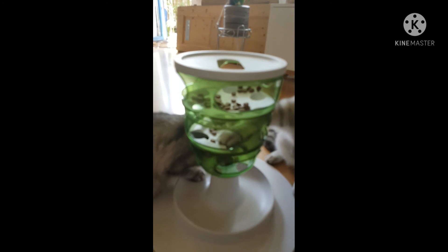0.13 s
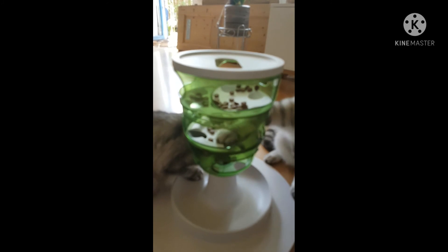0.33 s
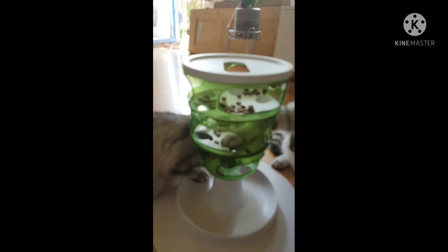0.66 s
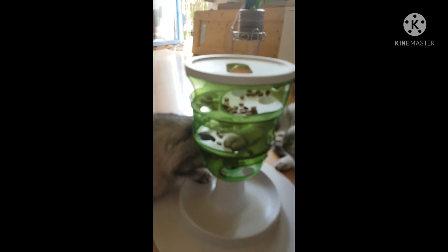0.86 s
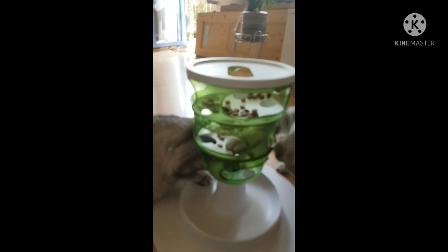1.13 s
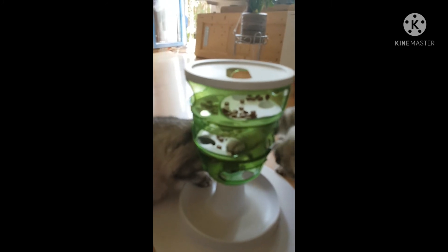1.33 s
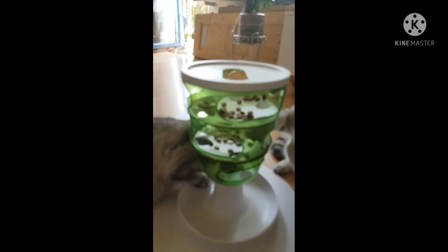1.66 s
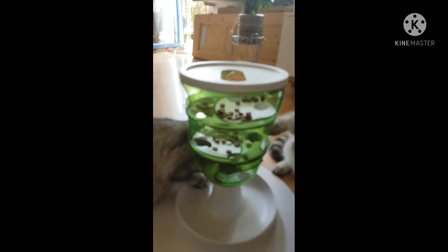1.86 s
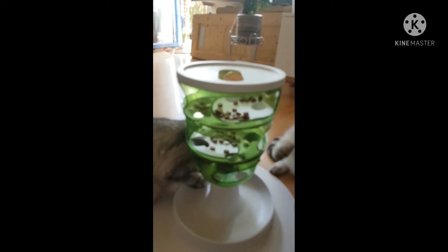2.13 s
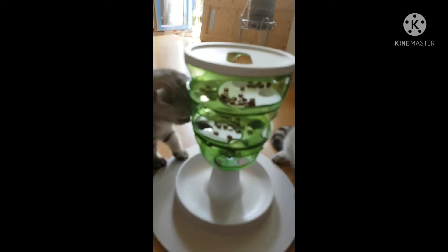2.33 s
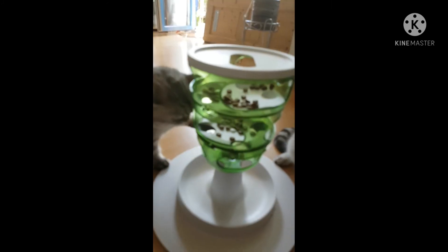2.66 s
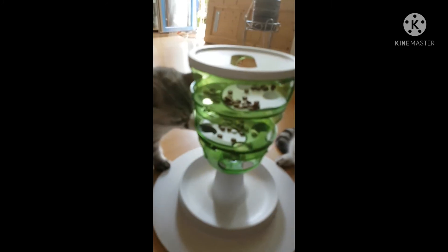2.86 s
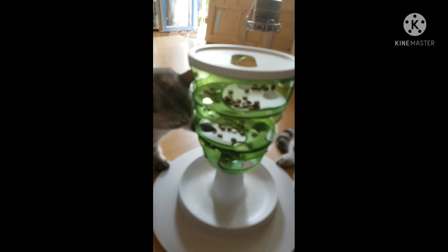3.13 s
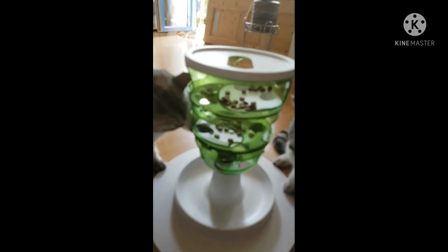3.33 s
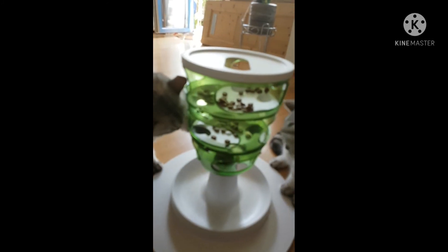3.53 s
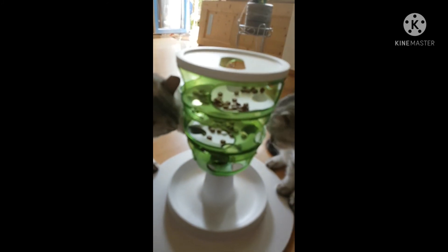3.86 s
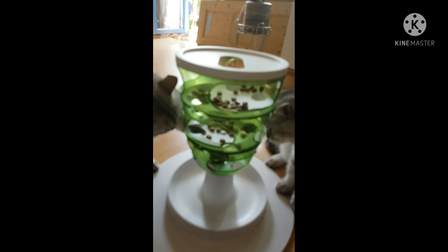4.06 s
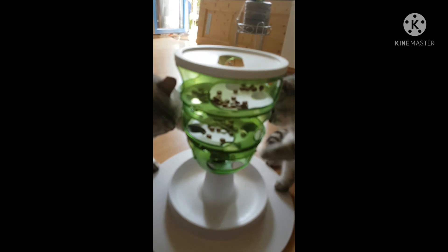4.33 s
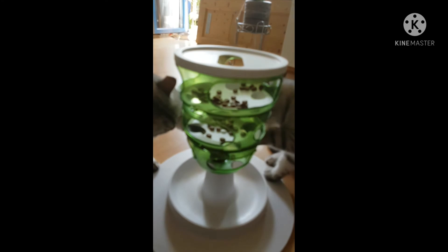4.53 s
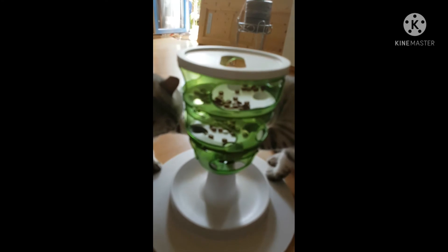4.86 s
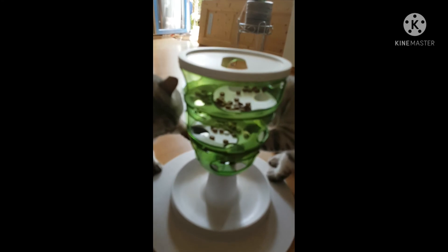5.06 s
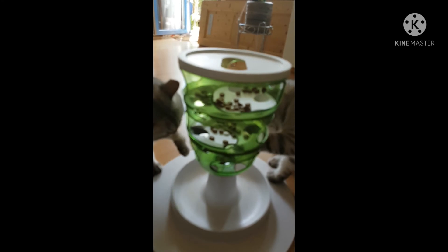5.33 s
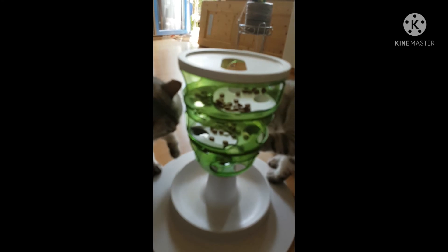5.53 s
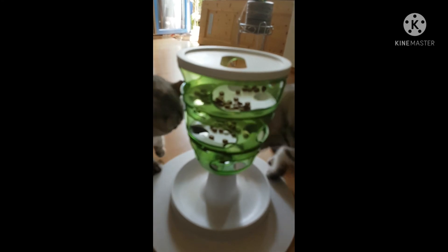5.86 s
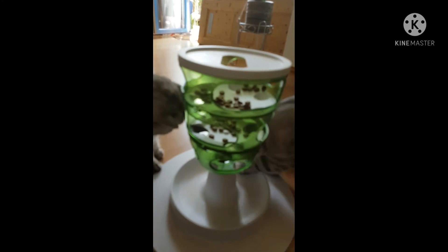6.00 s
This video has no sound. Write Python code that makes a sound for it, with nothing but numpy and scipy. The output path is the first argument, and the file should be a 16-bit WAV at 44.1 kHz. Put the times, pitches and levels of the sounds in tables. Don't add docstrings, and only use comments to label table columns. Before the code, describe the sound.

Dry kibble ticks, rattles and scrapes on the plastic tiers of a treat tower as cats paw it, over a faint motor hum.

```python
import sys
import numpy as np
from scipy import signal
from scipy.fft import rfft, irfft
from scipy.io import wavfile
from scipy.ndimage import uniform_filter1d

SR = 44100
rng = np.random.default_rng(int(sys.argv[2]) if len(sys.argv) > 2 else 0)


def store_wav(level_fs):
    pcm = np.round(np.clip(np.atleast_2d(level_fs), -1, 1) * 32767)
    wavfile.write(sys.argv[1], SR, pcm.T.astype(np.int16))


def magnitude_from_level(level_db):
    exponent = np.asarray(level_db, float) / 20
    return 10 ** exponent


N = 272538

# start in seconds, peak in dB, tray ring in Hz, pellet tick in dB re the peak.
WALL_HITS = [(0.1903, -27, 1940, -24), (0.2552, -34, 1540, -14), (1.142, -47, 1370, -11),
             (1.254, -36.5, 4560, -10), (1.416, -41.5, 1420, -4), (1.6843, -44, 2650, 1),
             (1.7547, -21, 3400, -40), (2.0599, -35, 4440, -24), (2.5033, -47.5, 2300, -26),
             (3.2172, -38.5, 1010, -25), (3.2864, -29, 3460, -25), (3.306, -45, 2340, -34),
             (3.3221, -25, 2520, -27), (3.5096, -30, 3070, -34), (3.5144, -29, 1050, -37),
             (3.5954, -19.5, 2150, -25), (3.6117, -22, 2260, -21), (3.8772, -19, 2800, -17.5),
             (3.9973, -34.5, 1410, -28.5), (4.2178, -39, 1030, -33), (4.2382, -33, 3000, -30),
             (4.5002, -33, 1010, -19), (4.7458, -30, 1220, -30), (4.7587, -36, 3000, -28),
             (4.7688, -36.5, 2400, -26), (5.1487, -40, 3100, -12.5), (5.233, -31.5, 3100, -20),
             (5.2846, -35.5, 2830, -14), (5.4851, -30, 2850, -21), (5.708, -26.5, 3120, -30)]
RIM_HITS = [(0.2226, -44, 2040, -2), (0.669, -38, 1820, -40), (0.9888, -35, 1610, -7.5),
            (1.5609, -38.5, 1320, -10), (1.731, -25.5, 2670, -17), (2.2348, -52, 1630, -5),
            (2.4178, -44.5, 1350, -27), (3.0634, -35, 968, -30), (3.2929, -33.5, 1540, -3.5),
            (3.2935, -24.5, 2400, -32), (3.3043, -25, 3100, -25), (3.3624, -20.5, 3030, -6),
            (3.5108, -45, 2670, -31), (4.3272, -12, 2960, -20), (4.7025, -37.5, 1296, -17),
            (4.7301, -34, 2800, -18), (5.4136, -38, 1040, -15), (5.4969, -17, 3530, -28),
            (5.5339, -24, 2770, -21), (5.5798, -26.5, 2500, -18), (5.812, -11, 7600, 0),
            (5.9472, -33, 2160, -12), (5.965, -26, 4000, -20), (6.008, -30.5, 7300, 11.5),
            (6.0175, -15.5, 1300, -33)]
TRAY_HITS = [(0.5735, -20.5, 1940, -1.5), (1.7826, -26.5, 1990, -25), (1.8796, -9.5, 4140, 5.5),
             (1.9452, -24.5, 3300, -13.5), (2.3629, -38.5, 1530, -34), (3.2911, -26, 2920, -30),
             (3.2997, -18.5, 1230, -40), (3.5967, -20.5, 2700, -49), (3.6022, -17.5, 1420, -36),
             (3.6035, -17.5, 1110, -24), (3.6081, -21, 1730, -48), (4.249, -30, 1220, -35),
             (4.2735, -39, 1170, -29), (5.0634, -47.5, 2400, 0), (5.2011, -36, 2900, -15),
             (5.228, -31, 3300, -25), (5.68, -30.5, 3080, -36), (5.7017, -22, 1280, -16.5),
             (5.7148, -22.5, 2130, -22), (5.7237, -33, 2050, -10), (5.8167, -11, 7700, -8.5),
             (5.8752, -8, 6400, -7.5), (5.898, -12.5, 4540, -7), (5.9187, -27, 4630, -21),
             (5.9828, -25.5, 3890, -6), (5.998, -27, 4960, -9), (6.0085, -16.5, 5660, -27),
             (6.0244, -18, 4800, -6)]
# start in seconds, peak in dB, ring in Hz.
PELLET_TICKS = [(0.16, -52, 7000), (0.4124, -52, 7750), (0.717, -44, 3950), (0.729, -45, 6400),
                (0.845, -44.5, 7000), (1.0044, -46, 4410), (1.0225, -43, 4300), (1.4004, -51, 4410),
                (1.4164, -39, 6560), (1.53, -44.5, 4660), (1.5404, -47, 4130), (1.6843, -46.5, 7500),
                (1.795, -33, 4370), (1.8084, -40.5, 4380), (1.817, -39.5, 4750), (2.2492, -46.5, 3650),
                (2.3794, -42.5, 4690), (4.9294, -48.5, 6600), (5.0635, -39.5, 3640)]
# start in seconds, echo level in dB, rattle length as a factor.
DEPTH = [(0, -5, 0.47), (.6, -1.5, 0.27), (.75, 2, .5), (1.7, -2, 0.22), (1.9, 1.5, 1.7), (3.2, 1.5, 2.2),
         (3.6, 2, 1.43), (3.88, -2, 1.34), (4.1, 13, 1.3), (4.33, 1, 0.85), (5.2, 7.5, 2.4),
         (5.55, 1, 1.15), (5.72, 1.5, 1.3), (5.8, 2, 0.67), (6.0, 4.5, 0.83), (6.18, 0, 1.2)]


def kibble():
    usual_db, longer_db_per_db = -31.5, 0.06
    ticks = [(s, db, hz, -12) for s, db, hz in PELLET_TICKS]
    # rows, body thump in dB re peak, rattle t60 in seconds
    kinds = [(WALL_HITS, -2.8, 0.031), (RIM_HITS, -7, 0.03), (TRAY_HITS, -46.5, 0.02), (ticks, -39, 0.0084)]
    out = np.zeros((2, N + 5000))
    longer = curve(DEPTH, column=2)
    for rows, body_db, t60 in kinds:
        for s, db, hz, tick_db in rows:
            start = round(s * SR)
            rattle_s = t60 * longer[start] * magnitude_from_level(longer_db_per_db * (db - usual_db))
            out[:, start:start + 3599] += contact(db, hz, body_db, tick_db, rattle_s)
    return thin(out[:, :N])


# mode in Hz, level in dB, t60 in seconds.
BODY_MODES = [(670, -11.5, 0.012), (1110, -23, 0.033), (1220, -4.5, 0.033), (1574, 24.5, 0.0026)]
# mode in Hz, level in dB, t60 in seconds.
TRAY_MODES = [(1940, -24.5, 0.0073), (2400, 7.5, 0.012), (2887, 12, 0.0066), (4034, 13, 0.0041),
              (4800, 13, 0.003), (5460, 21.5, 0.0015)]
# mode in Hz, level in dB, t60 in seconds.
PELLET_MODES = [(6820, 30.5, 0.00043), (7800, -3, 0.011), (8740, -5.5, 0.0039), (10870, -7, 0.0043),
                (11100, -10, 0.00066), (13500, -1, .0007), (13800, -3.5, 0.00033)]
TO_WALLS_DB = [-2.5, -1, 1.5, -2.5]


def contact(peak_db, hz, body_db, tick_db, t60):
    t = np.arange(2000) / SR
    touches = rng.standard_normal(2000) * (rng.random(2000) < 0.13)
    touches *= magnitude_from_level(-60 * t / np.clip(t60, 0.001, 0.1))
    touches *= 1 - np.exp(-t / 0.0005)
    touches[6] = 0.41
    detune = np.exp(0.048 * rng.standard_normal((3, 8)))
    struck = ring([(hz, 0, 12 / hz)], np.ones(1))
    stirred = [(f, db - 4.6 * abs(np.log2(f / hz)), decay) for f, db, decay in TRAY_MODES]
    trays = ring(stirred, detune[0])
    wall = ring(BODY_MODES, detune[1])
    pellet = ring(PELLET_MODES, detune[2]) + crack()
    parts = struck, trays, wall, pellet
    shares = magnitude_from_level(peak_db + np.array([-4.5, -4.0, body_db - 2.0, tick_db + 11.5]))
    sizes = [share / abs(np.convolve(touches, part)).max() for share, part in zip(shares, parts)]
    direct = np.convolve(touches, np.dot(sizes, parts))
    to_walls = np.dot(sizes * magnitude_from_level(np.array(TO_WALLS_DB)), parts)
    return direct, np.linalg.norm(touches) * np.pad(to_walls, (0, 1999))


def ring(modes, detune, count=1600):
    t = np.arange(count) / SR
    out = np.zeros(count)
    for (hz, db, t60), factor in zip(modes, detune):
        out += magnitude_from_level(db - 60 * t / t60) * np.sin(2 * np.pi * hz * factor * t)
    return (1 - np.exp(-t / 0.00024)) * out


def crack():
    return magnitude_from_level(5) * np.pad([0., 1, -2, 1], (2, 1594))


def thin(x):
    return signal.sosfilt(signal.butter(2, 650, "high", fs=SR, output="sos"), x)


def scrape():
    touches_per_s = 700 * magnitude_from_level(7.0 * drift(25))
    sizes = magnitude_from_level(4.2 * np.minimum(rng.exponential(1, N), 4)) * rng.choice([-1, 1], N)
    touches = sizes * (rng.random(N) < touches_per_s / SR)
    spot = rng.integers(0, 6, N)
    out = np.zeros(N)
    for k, detune in enumerate(np.exp(0.15 * rng.standard_normal((6, 8)))):
        shape = ring(TRAY_MODES, detune)
        shape += magnitude_from_level(-2.0) * ring(BODY_MODES, detune)
        shape += magnitude_from_level(8.0) * ring(PELLET_MODES, np.sqrt(detune))
        out += signal.oaconvolve(touches * (spot == k), shape)[:N]
    return strokes() * evened(out)


# middle in seconds, level in dB, half length in seconds.
STROKES = [
    (1.7, -67, 0.33),
    (1.922, -45, 0.028),
    (3.75, -68, 0.89),
    (4.73, -61, 0.15),
    (5.178, -55, 0.085),
    (5.52, -60.5, 0.2),
    (5.77, -61, 0.13),
    (5.85, -40, 0.032),
    (5.948, -44.5, .07),
    (6.073, -53, 0.054),
]


def strokes():
    t = np.arange(N) / SR
    return magnitude_from_level(-77) + sum(magnitude_from_level(db) * np.exp(-((t - s) / half) ** 2) for s, db, half in STROKES)


# start in seconds, peak in dB, pitch in Hz.
KNOCKS = [(1.88, -33, 424), (1.88, -29.5, 870), (3.6, -34, 353), (4.328, -42, 880), (4.329, -35.5, 423),
          (5.812, -27, 308), (5.812, -41, 550), (5.812, -27.5, 730), (5.817, -28, 460), (6.014, -23.5, 318),
          (6.016, -30.5, 347)]
# start in seconds, peak in dB, pitch in Hz, t60 in seconds.
RINGS = [(.191, -35.5, 910, 0.01), (.191, -38.5, 2850, 0.035), (.426, -53, 7950, 0.013),
         (0.573, -13.5, 1850, 0.0095), (.574, -19, 1060, 0.0051), (.574, -31, 1950, 0.061),
         (0.672, -25.5, 1840, 0.0074), (0.713, -56, 6360, 0.1), (0.987, -39, 4460, 0.015),
         (1.005, -40, 1490, 0.026), (1.255, -32.5, 6200, 0.0069), (1.881, -44, 8370, 0.074),
         (1.881, -15.5, 5280, 0.02), (1.881, -30, 2600, .1), (1.88, -15, 3276, 0.04),
         (6.014, -25, 1760, 0.028), (2.06, -30.5, 4600, 0.015), (3.877, -24.5, 2360, 0.02),
         (4.33, -36, 1455, 0.16), (5.819, -25, 3090, 0.089), (5.844, -31, 1220, 0.042),
         (5.856, -31, 1260, 0.035), (6.014, -23, 1290, 0.043), (6.025, -25.5, 2693, 0.11),
         (6.026, -23.5, 3900, 0.025), (6.03, -33.5, 1350, 0.23), (6.026, -46, 5300, 0.08),
         (6.026, -23.5, 6380, 0.04), (5.82, -35, 2110, 0.12), (5.88, -40, 2100, 0.037)]


def thumps():
    out = np.zeros(N + 6000)
    fade = np.hanning(12000)[6000:]
    knocks = [(s, db, hz, 0.025) for s, db, hz in KNOCKS]
    neighbours = [(1, 0), (1.3, -11.0), (0.85, -13.5), (1.024, -12.5), (1.1, -14.5)]
    for s, db, hz, t60 in knocks + list(RINGS):
        modes = [(hz * factor, db + change, t60) for factor, change in neighbours]
        start = round(s * SR)
        out[start:start + 6000] += ring(modes, np.ones(5), count=6000) * fade
    return out[:N]


# frequency in Hz, t60 in seconds.
ROOM_T60 = [(200, 0.34), (1000, .4), (3000, 0.39), (8000, 0.25), (15000, 0.28)]


def room(x):
    count, spacing = SR // 2, 12
    out = np.zeros(N)
    turn = np.arange(N) / SR * 7.9
    for k in range(3):
        taps = np.zeros(count)
        at = np.arange(120, count - spacing, spacing)
        taps[at + rng.integers(0, spacing, len(at))] = rng.choice([-1., 1.], len(at))
        hz, t, z = signal.stft(taps, SR, nperseg=128)
        decay = magnitude_from_level(-60 * t / read(ROOM_T60, hz)[:, None])
        tail = signal.istft(z * decay, SR, nperseg=128)[1]
        share = np.sqrt(2 / 3) * np.cos(turn + k * np.pi / 3)
        out += signal.fftconvolve(x * share, tail / np.linalg.norm(tail))[:N]
    return out


def port(x):
    low = signal.oaconvolve(x, signal.firwin(127, 9000, fs=SR), "same")
    return low + magnitude_from_level(-7) * (x - low)


# time in seconds, seventh shaft order in Hz.
MOTOR_SPEED = [(0, 75.5), (.65, 76.3), (1.05, 78.6), (1.4, 76), (1.8, 73.5), (2.55, 73), (2.9, 76.5),
               (3.35, 73), (3.55, 77.3), (4.85, 77.3), (5.1, 74.6), (6.18, 76.5)]
# multiple of the shaft rate, level in dB.
SHAFT_ORDERS = [(5, -28), (6, -6), (7, 1), (8, -42.5), (11, -36), (12, -7), (13, -12), (14, -7.5)]


def motor():
    turn = 2 * np.pi * np.cumsum(curve(MOTOR_SPEED) / 7) / SR
    out = np.zeros(N)
    for k, db in SHAFT_ORDERS:
        level = magnitude_from_level(db + 0.037 * k * drift(2.5))
        phase = 0.12 * k * drift(1.33) + 2 * np.pi * rng.random()
        out += level * np.sin(k * turn + phase)
    return evened(out)


# frequency in Hz, level in dB per Hz.
AIR_SPECTRUM = [(20, -16), (35, -19.5), (60, -12), (100, -7.5), (145, -7.5), (250, -14.5), (600, -19),
                (950, -23.5), (2100, -28.5), (3000, -23), (3630, -33.5), (8600, -41.5), (9300, -46.5),
                (14700, -41.5)]


def air():
    frames, hz = N // 512 + 5, np.fft.rfftfreq(2048, 1 / SR)
    a, b, patches = rng.standard_normal((frames, 1025, 3)).T
    patches = evened(uniform_filter1d(uniform_filter1d(patches, 20, 0), 6, 1))
    z = (a + 1j * b) * magnitude_from_level(read(AIR_SPECTRUM, hz)[:, None] + 1.53 * patches)
    return evened(signal.istft(z, nperseg=2048, noverlap=1536)[1][:N])


# start in seconds, drop in dB, hold in seconds.
DUCKS = [
    (1.87, -8, .5),
    (5.805, -5.5, .5),
    (5.816, -6, 0.018),
]


def gain():
    start_db, creep_db_per_s, ceiling_db = -49.5, 1.74, -43.5
    fall_s, recover_s = 0.017, 0.12
    t = np.arange(N) / SR
    level_db = np.minimum(start_db + creep_db_per_s * t, ceiling_db)
    for s, db, hold in DUCKS:
        corners = np.cumsum([0, fall_s, hold, recover_s])
        level_db = level_db + db * np.interp(t - s, corners, [0, 1, 1, 0])
    return magnitude_from_level(level_db)


def evened(x):
    return x / np.sqrt(np.mean(x ** 2) + 1e-20)


def read(points, hz):
    f, value = np.transpose(points)
    return np.interp(np.log(hz + 1), np.log(f + 1), value)


def curve(rows, column=1):
    table = np.transpose(rows)
    return np.interp(np.arange(N) / SR, table[0], table[column])


def drift(hz):
    spectrum = rfft(rng.standard_normal(N))
    return evened(irfft(spectrum * np.exp(-(np.fft.rfftfreq(N, 1 / SR) / hz) ** 2), N))


def scene():
    direct, spread = kibble()
    drag, rings = thin(scrape()), thumps()
    to_room = spread + drag + magnitude_from_level(-2) * rings
    echoes = room(magnitude_from_level(curve(DEPTH) - 9.0) * to_room)
    background = gain() * (motor() + magnitude_from_level(-2.0) * air())
    return (port(direct + drag + rings + echoes) + background)[None]


def low_pass(x):
    return signal.sosfilt(signal.butter(12, 16790, fs=SR, output="sos"), x)


def record(dry):
    held = 0.77 * np.tanh(dry / 0.71) - 0.0032
    band_limit = signal.firwin(511, 15600, window=("kaiser", 9), fs=SR)
    mix = signal.oaconvolve(held, band_limit[None], "same")
    return low_pass(mix)


dry = scene()
out = record(dry)
store_wav(out)
```